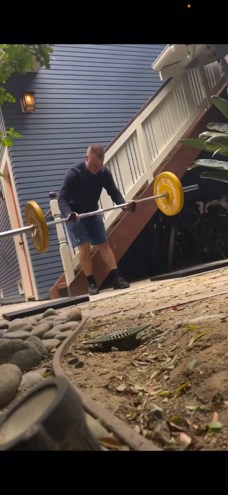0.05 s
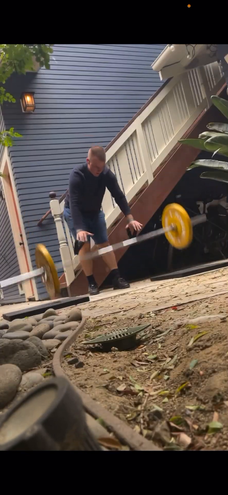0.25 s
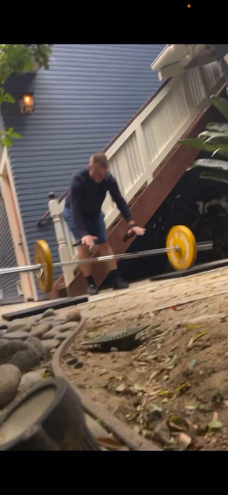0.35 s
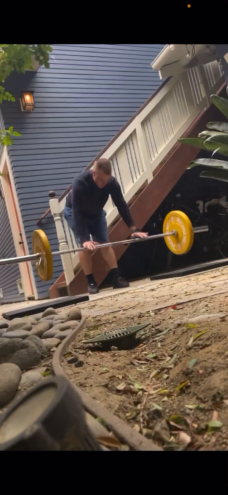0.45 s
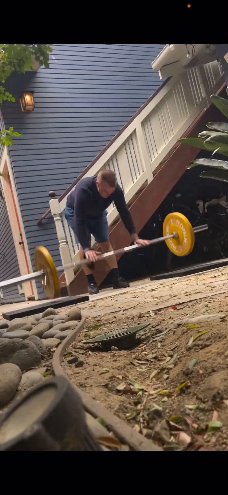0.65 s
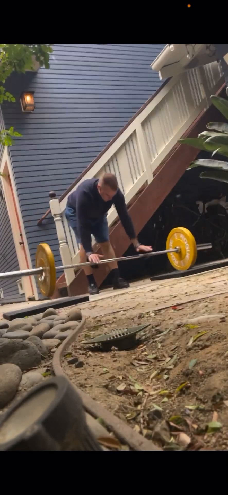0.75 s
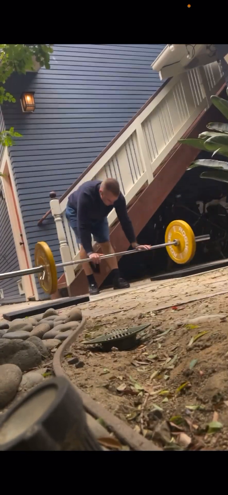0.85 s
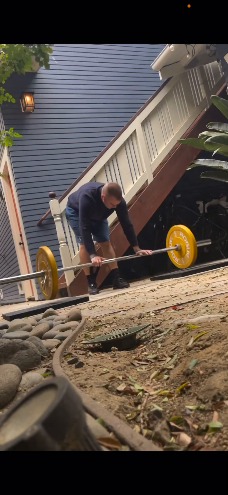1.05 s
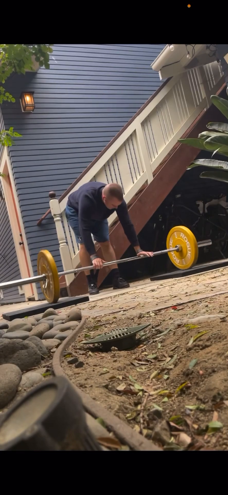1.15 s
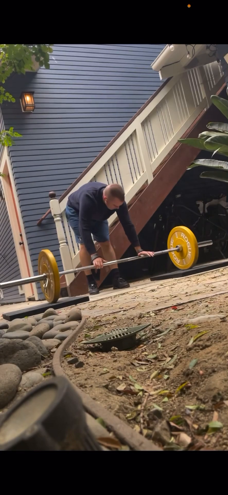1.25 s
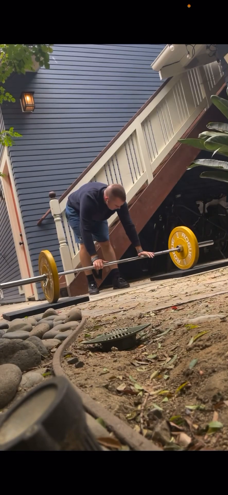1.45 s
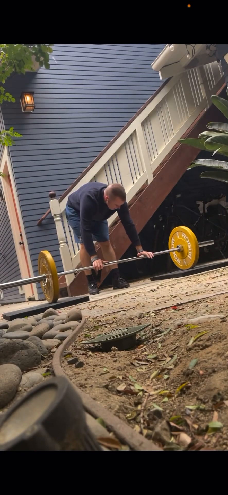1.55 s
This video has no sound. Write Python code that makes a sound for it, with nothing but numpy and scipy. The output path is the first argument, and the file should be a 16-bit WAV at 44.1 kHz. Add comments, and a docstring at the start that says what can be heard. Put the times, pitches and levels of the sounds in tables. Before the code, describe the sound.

A dropped barbell thuds on the ground outdoors and bounces to rest, steel clattering.

```python
"""A barbell with rubber plates is dropped on paved ground beside a house and bounces to rest.
Its two ends land one after the other. Each impact gives a short knock of falling pitch and excites
the low modes of the whole weight, heard as a deep boom. The loose steel sleeves chatter and clink,
driving the bending modes of the bar. Wall and stairs reflect the knocks and the steel over quiet air."""
import sys
import numpy as np
from scipy import signal
from scipy.io import wavfile

SR = 44100
rng = np.random.default_rng(int(sys.argv[2]) if len(sys.argv) > 2 else 0)


def generate_wav(sig):
    """Save sig (samples, or channels by samples) to the path in sys.argv[1] as 16-bit PCM at SR."""
    pcm = np.round(np.clip(np.atleast_2d(sig).T, -1, 1) * 32767).astype(np.int16)
    wavfile.write(sys.argv[1], SR, pcm)


N = 70560

# Outdoor background. Each row: frequency in Hz, relative spectral density in dB.
AIR_SPECTRUM = [(20, -13), (60, -8.5), (130, -4.5), (250, -14.5), (500, -21), (1000, -32.5), (2500, -36.5),
                (5000, -41), (8000, -59), (10000, -60)]
# Sleeves and plates chatter. Each row: start in seconds, level in dB, time until release in seconds,
# treble gain in dB, release T60 in seconds.
RATTLES = [(0, -45, 0.0042, -3.5, 0.19), (0.2516, -16.5, 0.049, 1, 0.092), (0.312, -14, 0.022, -0.5, 0.41),
           (0.481, -43, 0.013, 6.5, 0.29), (0.651, -23, 0.037, -5.5, 0.14), (0.693, -25, 0.091, 0, 0.31),
           (0.928, -29.5, 0.049, -4.5, 0.15), (0.994, -34, 0.022, -1.5, 0.43),
           (1.061, -35.5, 0.0076, -10, 0.22), (1.115, -29.5, 0.033, -5.5, 0.26),
           (1.16, -35.5, 0.011, 2.5, 0.11), (1.2593, -33, 0.0024, -11, 0.11),
           (1.332, -38, 0.0086, -3.5, 0.2)]
# The clack of steel on steel. Each row: frequency in Hz, relative spectral density in dB.
CLACK_SPECTRUM = [(150, 1.5), (500, 3.5), (800, -2), (1150, 3.5), (1380, -2), (1660, -4.5), (2100, 2),
                  (3200, -5), (4000, -1.5), (4550, -5), (5150, 2), (6100, -9), (7000, -7.5), (7600, -5.5),
                  (8800, -19.5), (10000, -22.5)]
# Bending modes of the bar. Each row: frequency in Hz, relative level in dB, T60 in seconds.
BAR_MODES = [(1131, -10, 0.16), (1218, 3, 0.14), (1541, 5, 0.16), (1822, 4, 0.19), (2103, 0, 0.097),
             (2506, -8.5, 0.19), (3010, 0, .13), (3483, -6, 0.33), (3872, -1.5, 0.3), (4360, -4, 0.18),
             (5080, -5, 0.067), (5670, -19.5, 0.18), (6190, -13.5, .22), (6470, -6.5, 0.29)]
# Modes of a sleeve and its stop. Each row: frequency in Hz, relative level in dB, T60 in seconds.
SLEEVE_MODES = [(3740, -10, 0.0047), (5180, -15, 0.027), (5370, 3, 0.0078), (5960, -1.5, 0.0072),
                (7270, 0.5, 0.017), (7875, -1, 0.029), (8550, -7.5, 0.023)]
# The weight heaves and the bar whips. Each row: start in seconds, level in dB.
BOOMS = [(0.034, -32.5), (0.071, -33), (0.133, -40), (0.2639, -12), (0.2764, -13), (0.3125, -8.5),
         (.3225, -11.5), (0.3416, -24), (0.3645, -8), (0.584, -27), (0.6761, -17.5), (0.7405, -12),
         (0.757, -31), (0.779, -13), (0.959, -35), (0.998, -16.5), (1.0355, -19), (1.153, -26),
         (1.1705, -28), (1.1931, -21), (1.258, -28), (1.301, -28), (1.428, -35.5)]
# The loaded bar on the ground. Each row: frequency in Hz, relative level in dB, T60 in seconds.
LOADED_BAR_MODES = [(61.33, 0, 0.55), (72.1, 3.5, 0.12), (84.6, 10, 0.068), (115.7, -10, 0.34)]
# Single sharp contacts of steel. Each row: start in seconds, level in dB.
CLICKS = [(.1216, -47), (0.2474, -25.5), (0.2635, -16), (.2825, -6), (0.3163, -6.5), (.3245, -20),
          (0.344, -23), (0.5886, -29.5), (.646, -21), (0.6621, -14.5), (0.6965, -34), (0.706, -9),
          (0.7328, -20), (0.756, -14.5), (0.769, -12), (0.9147, -30), (0.9386, -18), (0.9615, -10.5),
          (1.134, -16), (1.163, -22.5), (1.293, -32.5), (1.3283, -21), (1.387, -33.5)]
# A plate meets the ground. Each row: start in seconds, knock level in dB, starting pitch in Hz,
# shudder level in dB.
LANDINGS = [(0.2473, -1, 745, -12), (0.3058, -2.5, 593, -14), (0.3188, -4, 677, -16.5),
            (.341, -7, 593, -27.5), (0.6454, -3.5, 639, -15.5), (0.7221, -13, 523, -15),
            (0.92, -6.5, 627, -18.5), (0.9805, -9, 426, -20.5), (0.9894, -11, 423, -32),
            (1.1052, -11, 640, -19), (1.150, -19, 481, -41), (1.2367, -14, 405, -27.5),
            (1.302, -28, 420, -34), (1.345, -25.5, 396, -34.5)]
# Reflections from wall and stairs. Each row: delay in seconds, gain in dB.
ECHOES = [(.0078, -17.5), (0.0188, -19), (0.0315, -12.5)]
# Dull ring of rubber plates and ground. Each row: frequency in Hz, relative spectral density in dB.
SHUDDER_SPECTRUM = [(25, -12), (50, 0.5), (110, 2.5), (180, 0), (240, -2), (320, 2.5), (450, -19),
                    (700, -15), (1100, -32), (3000, -65.5)]


def amp(db):
    """Amplitude ratio for a level in decibels."""
    return 10 ** (np.asarray(db) / 20)


def unit(x):
    """Normalisation to an rms of 1."""
    return x / np.sqrt(np.mean(x ** 2) + 1e-20)


def since(start):
    """Seconds elapsed since start, zero before it."""
    return np.maximum(np.arange(N) / SR - start, 0)


def convolve(x, response):
    """Convolution: the output of a linear system driven by x."""
    return signal.fftconvolve(x, response)[:N]


def colour(x, spectrum, size=8192):
    """Minimum-phase filtering, with unit energy and the given spectral shape."""
    hz, db = np.transpose(spectrum)
    log_hz = np.log(abs(np.fft.fftfreq(size, 1 / SR)) + 1)
    log_gain = np.log(amp(np.interp(log_hz, np.log(hz), db)))
    response = np.fft.ifft(np.exp(np.conj(signal.hilbert(log_gain)))).real[:size // 2]
    return convolve(x, response / np.linalg.norm(response))


def low_cut(x, hz):
    """Zero-phase high-pass filtering, which leaves the timing unchanged."""
    return signal.filtfilt(*signal.butter(2, hz, "high", fs=SR), x, padtype=None)


def ring(modes, t):
    """Free vibration as a superposition of damped sinusoids."""
    return sum(amp(db - 60 * t / t60) * np.sin(2 * np.pi * hz * t) for hz, db, t60 in modes)


def air(level_db=-43):
    """Stationary noise, strongest in the bass, forms the outdoor background."""
    return amp(level_db) * unit(colour(rng.standard_normal(N), AIR_SPECTRUM))


def chatter(taps_per_s=2600, spread_db=2.5, clump_hz=75.6, clump_db=2):
    """A Poisson process of uneven taps, grouped into clumps by random amplitude modulation."""
    taps = (rng.random(N) < taps_per_s / SR) * rng.choice([-1., 1.], N)
    clumps = unit(signal.lfilter(*signal.butter(2, clump_hz, fs=SR), rng.standard_normal(N)))
    strength = np.minimum(rng.exponential(1, N), 2)
    return unit(taps * amp(spread_db * strength + clump_db * clumps))


def burst(start, db, hold, t60, rise_s=0.0056):
    """Envelope of one rattle: linear attack, hold and exponential decay."""
    return np.minimum(since(start) / rise_s, 1) * amp(db - 60 * since(start + hold) / t60)


def steel(taps, ring_db, split_hz=11.7, lower_mode_db=1.5):
    """Impacts clack and excite the bar; bending in two planes splits each mode into a beating pair."""
    t = since(0)[:SR // 2]
    upper = ring([(hz + split_hz, db, t60) for hz, db, t60 in BAR_MODES], t)
    lower = ring([(hz - split_hz, db, t60) for hz, db, t60 in BAR_MODES], t)
    bar = upper + amp(lower_mode_db) * lower
    return colour(taps, CLACK_SPECTRUM) + amp(ring_db) * convolve(taps, bar / np.linalg.norm(bar))


def rattles(crossover_hz=3000):
    """Repeated collisions of loose sleeves and plates drive the bar in bursts."""
    dull = signal.lfilter(*signal.butter(2, crossover_hz, "low", fs=SR), chatter())
    bright = signal.lfilter(*signal.butter(2, crossover_hz, "high", fs=SR), chatter())
    taps = sum(burst(start, db, hold, t60) * (dull + amp(treble_db) * bright)
               for start, db, hold, treble_db, t60 in RATTLES)
    return steel(taps, ring_db=-8.5)


def sleeve(taps):
    """Modal ringing of a sleeve: each tap excites its high, short-lived modes in new proportions."""
    t = since(0)[:SR // 20]
    ringing = sum(convolve(taps * rng.uniform(0.3, 1.7, N), ring([mode], t)) for mode in SLEEVE_MODES)
    return ringing / abs(ring(SLEEVE_MODES, t)).max()


def clinks(taps_per_s=83, t60=0.35, level_db=-4.5):
    """Sparse impacts on the sleeves accompany each rattle and weaken exponentially."""
    bursts = [burst(start, db + treble_db, hold, t60) for start, db, hold, treble_db, _ in RATTLES]
    taps = (rng.random(N) < taps_per_s / SR) * rng.choice([-1., 1.], N) * rng.uniform(1, 1.1, N)
    return amp(level_db) * sleeve(np.max(bursts, axis=0) * taps)


def booms(rise_s=0.0068):
    """Damped free vibration of the whole weight in its low modes."""
    vibration = np.zeros(N)
    for start, db in BOOMS:
        t = since(start)
        vibration += amp(db) * (1 - np.exp(-t / rise_s)) * ring(LOADED_BAR_MODES, t)
    return low_cut(vibration, hz=18)


def clicks(scrape_decay_s=0.0015, clink_db=-5, scrape_db=-4.5):
    """Impulsive excitation: a sleeve snaps against its stop, with a clink and a brief scrape."""
    taps = np.zeros(N)
    for start, db in CLICKS:
        taps[round(start * SR)] += amp(db)
    envelope = convolve(taps, np.exp(-since(0)[:SR // 20] / scrape_decay_s))
    scrape = low_cut(envelope * rng.standard_normal(N), hz=2200)
    return amp(clink_db) * sleeve(taps) + amp(scrape_db) * steel(scrape, ring_db=-5.5)


def knocks(end_hz=139, fall_s=0.0034, peak_s=0.0023):
    """Each landing radiates a brief downward chirp; reflection at the house adds delayed copies."""
    direct = np.zeros(N)
    for start, db, start_hz, _ in LANDINGS:
        t = since(start)
        cycles = end_hz * t + (start_hz - end_hz) * fall_s * (1 - np.exp(-t / fall_s))
        envelope = (t / peak_s * np.exp(1 - t / peak_s)) ** 2
        direct -= amp(db) * envelope * np.sin(2 * np.pi * cycles)
    direct = low_cut(direct, hz=166)
    return direct + sum(amp(db) * np.interp(since(delay), since(0), direct) for delay, db in ECHOES)


def shudder(rise_s=0.0091, t60=0.39):
    """Modal overlap: crowded low modes of plates and ground merge into noise; landings add in power."""
    power = np.zeros(N)
    for start, _, _, db in LANDINGS:
        t = since(start)
        power += (amp(db - 60 * t / t60) * np.minimum(t / rise_s, 1)) ** 2
    return np.sqrt(power) * unit(colour(rng.standard_normal(N), SHUDDER_SPECTRUM))


def yard(x, level_db=-14, delay_s=0.0068, t60=0.63, treble_t60=0.4, crossover_hz=8600):
    """Reverberation: scattered reflections form a thin tail whose treble decays sooner."""
    t = since(delay_s)[:SR]
    noise = rng.standard_normal(SR)
    low = signal.lfilter(*signal.butter(1, crossover_hz, fs=SR), noise)
    treble = noise - low
    tail = (t > 0) * (low * amp(-60 * t / t60) + treble * amp(-60 * t / treble_t60))
    return amp(level_db) * convolve(x, tail / np.linalg.norm(tail))


def scene(knock_send_db=-2.5):
    """Superposition of the bouncing barbell, its reverberation and the air, in one channel."""
    metal = rattles() + clinks() + clicks()
    rubber = knocks()
    reverberation = yard(metal + amp(knock_send_db) * rubber)
    return (metal + rubber + reverberation + shudder() + booms() + air())[None]


def record(dry, ceiling=1.17, cutoff_hz=9850):
    """Soft saturation rounds the loudest peaks; a low-pass filter then limits the bandwidth."""
    rounded = dry / (1 + (dry / ceiling) ** 4) ** (1 / 4)
    low_pass = signal.firwin(255, cutoff_hz, window=("kaiser", 8), fs=SR)
    return signal.oaconvolve(rounded, low_pass[None], "same")


dry = scene()
out = record(dry)
generate_wav(out)
```